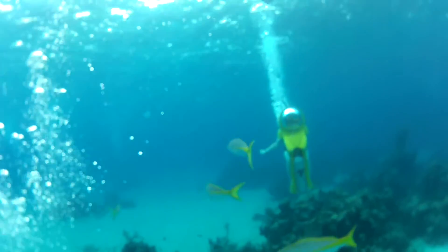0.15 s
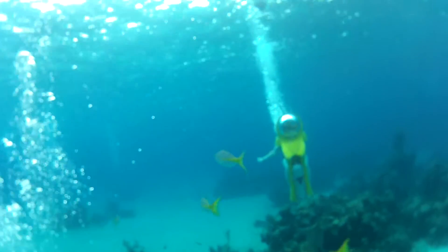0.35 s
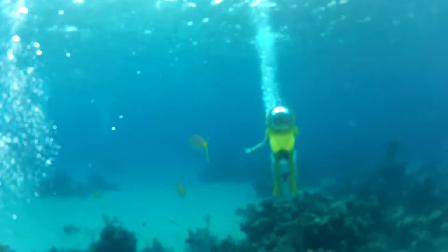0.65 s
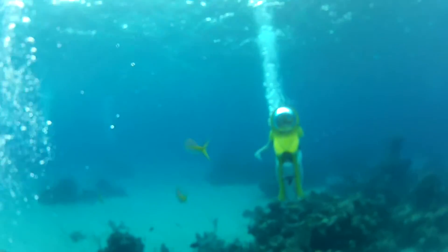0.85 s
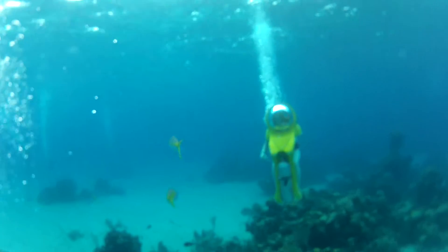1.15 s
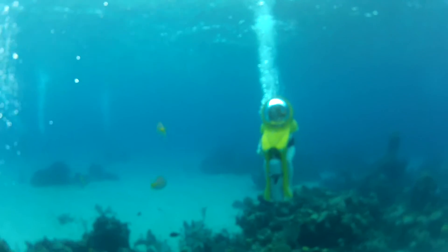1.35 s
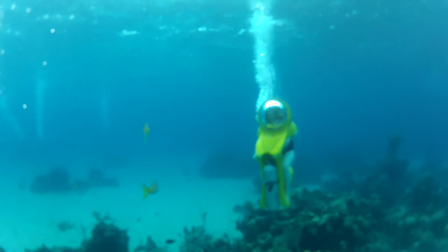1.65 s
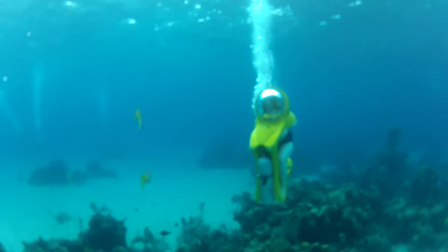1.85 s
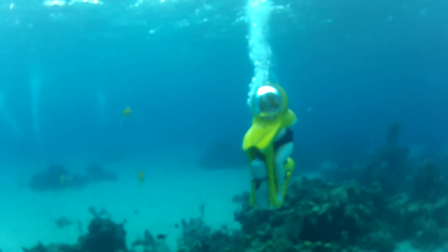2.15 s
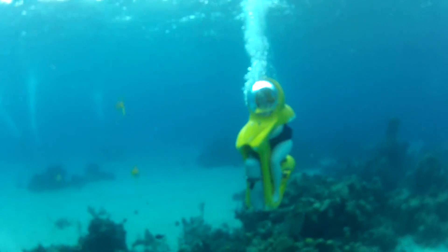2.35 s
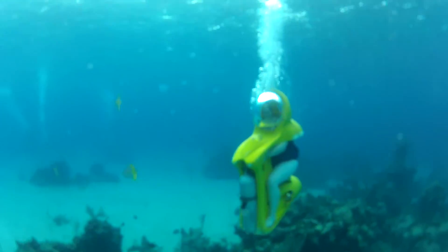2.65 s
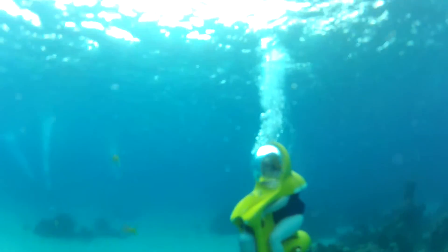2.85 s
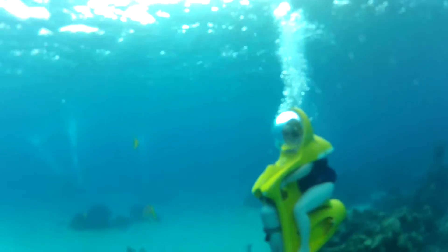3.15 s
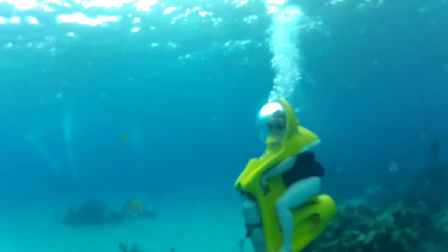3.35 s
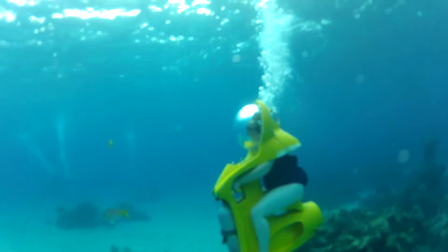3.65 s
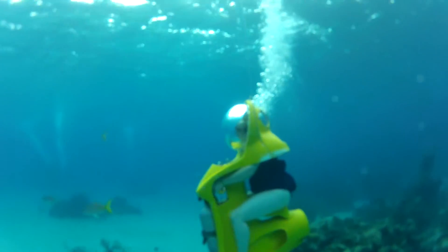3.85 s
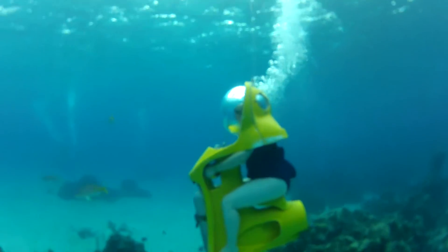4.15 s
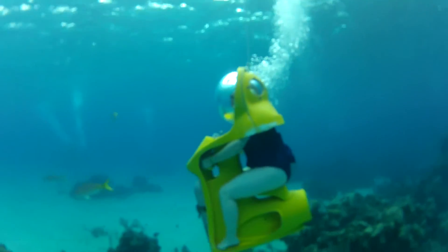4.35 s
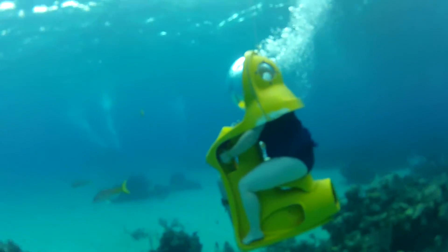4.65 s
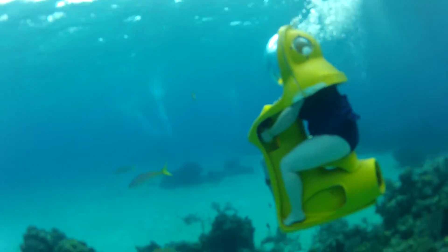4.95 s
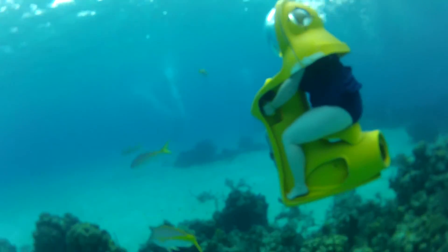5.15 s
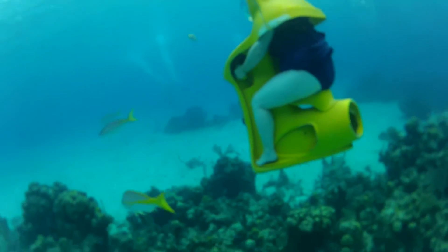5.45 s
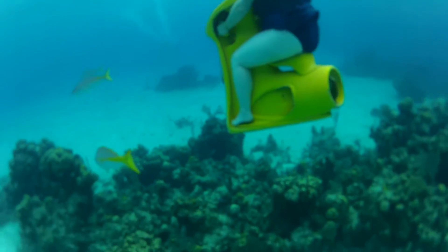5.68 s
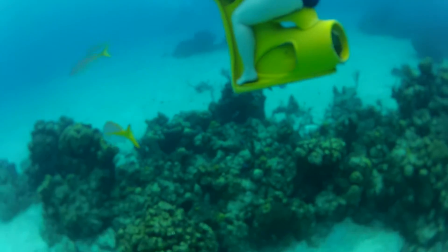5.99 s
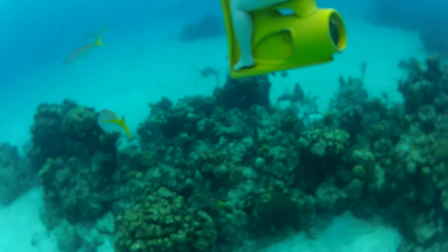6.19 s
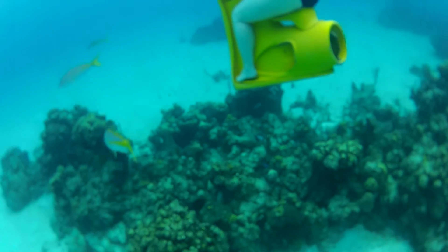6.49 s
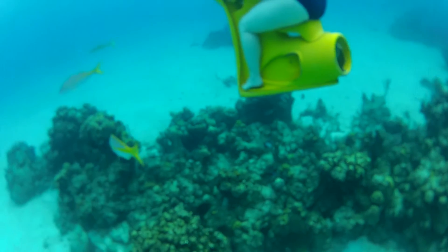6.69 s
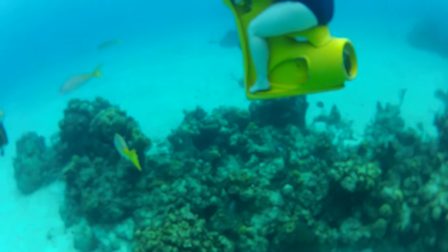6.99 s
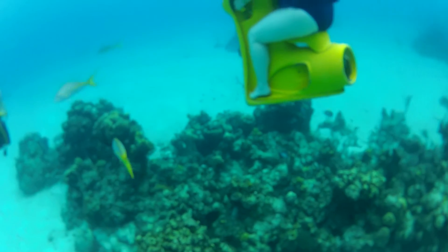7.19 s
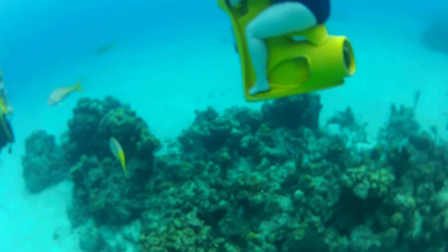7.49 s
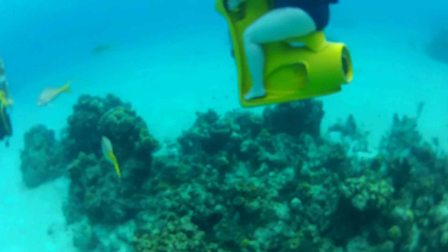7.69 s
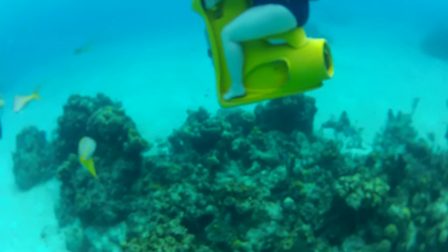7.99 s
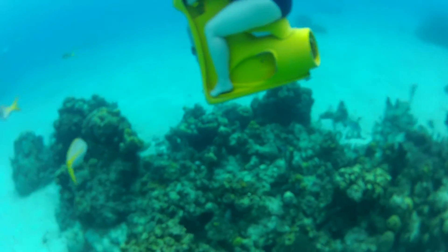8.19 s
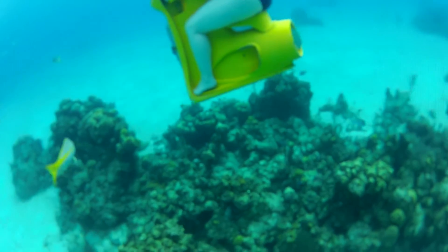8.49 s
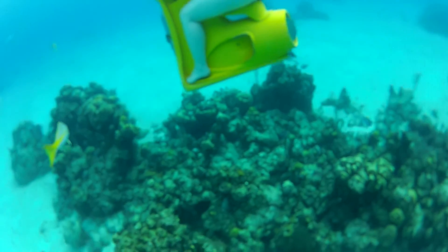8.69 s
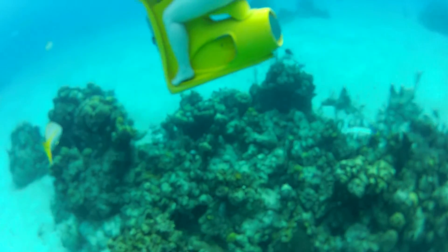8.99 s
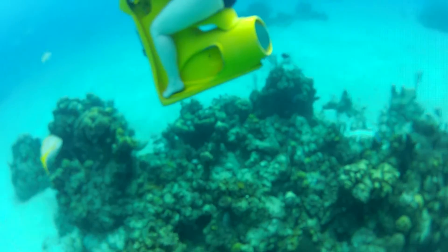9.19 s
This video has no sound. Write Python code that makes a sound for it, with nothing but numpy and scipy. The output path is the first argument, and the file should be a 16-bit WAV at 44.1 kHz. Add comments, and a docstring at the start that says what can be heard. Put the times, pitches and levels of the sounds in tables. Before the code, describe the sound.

An underwater scooter passes, heard from inside a watertight camera housing that gives higher sounds a hollow ring. From the start, its motor holds a low, steady drone while exhaust air burbles in deep swells and gulps over a soft rush of water. Faint, sharp snaps dot the first two seconds, and a sharp knock hits the housing at about 1.1 seconds. From around 2.5 seconds the propeller shaft begins a rapid, uneven, high squeaking, prominent from 4 seconds to the end. The bubbles give strong gulps near 3.6 and 4.5 seconds. Softer knocks come at about 3.8 and 5.8 seconds, followed by a tiny spurt of air. After 5 seconds the drone and burbling weaken, while the squeaks grow denser and a light propeller hiss rises, lasting until the end at about 9.3 seconds. A thin, high fizz runs faintly throughout.

```python
"""Underwater, a scooter cruises past a camera in a watertight housing.
Its motor drones, exhaust air burbles upward, and its propeller shaft rubs and squeaks twice a turn.
The squeaks, rushing water, faint snaps, a few knocks and one spurt of air ring in the housing.
A coarse sound input mirrors the scene into a thin, high fizz."""
import sys
import numpy as np
from scipy import signal
from scipy.fft import rfft, irfft, next_fast_len
from scipy.io import wavfile
from scipy.ndimage import uniform_filter1d

SR = 44100
rng = np.random.default_rng(int(sys.argv[2]) if len(sys.argv) > 2 else 0)


def put_to_file(sound):
    """Save the sound as 16-bit audio at rate SR, in the file named by the first command-line argument."""
    columns = np.atleast_2d(sound).T  # one column per channel
    safe = np.clip(columns, -1, 1)
    whole_steps = np.round(safe * 32767)
    wavfile.write(sys.argv[1], SR, whole_steps.astype(np.int16))


N = 411453
TIME = np.arange(N) / SR


def from_db(db):
    """Turn decibels into a number to multiply a sound by."""
    return 10 ** (np.asarray(db) / 20)


def rms_one(x):
    """Scale a sound so that its average power is 1."""
    return x / np.sqrt(np.mean(x ** 2) + 1e-20)


def in_time(rows):
    """Join a table's timed points with straight lines: one curve for each column after the time."""
    times, *columns = np.transpose(rows)
    return [np.interp(TIME, times, column) for column in columns]


def drift(rate_hz):
    """A smooth random wobble, about 1 in size; a higher rate makes it quicker."""
    step = 20   # samples between computed points
    decay = np.exp(-2 * np.pi * step * rate_hz / SR)
    noise = rng.standard_normal(N // step + 4002)
    slow = signal.lfilter([1], [1, -2 * decay, decay * decay], noise)[4000:]   # let it settle first
    return np.interp(np.arange(N) / step, np.arange(len(slow)), rms_one(slow))


def cut(x, hz, kind, order=2):
    """Keep the "low" or "high" side of a frequency; a higher order gives a sharper edge."""
    return signal.sosfilt(signal.butter(order, min(hz, SR / 2 - 1), kind, fs=SR, output="sos"), x)


def hiss(low_hz, high_hz, order=2):
    """Noise between two frequencies, with average power 1."""
    return rms_one(cut(cut(rng.standard_normal(N), low_hz, "high", order), high_hz, "low", order))


def add(out, start_s, sound):
    """Mix a sound in at the given time."""
    start = max(int(start_s * SR), 0)
    out[start:start + len(sound)] += sound[:max(N - start, 0)]


def motor(waver_db=1.0):
    """The spinning motor hums at whole multiples of its speed, each tone wavering a little."""
    # how fast the motor spins (time [s], speed [turns/s])
    speed = [(0, 32.84), (1.7, 32.83), (2.5, 32.69), (4.2, 32.75), (5.3, 32.88), (6.2, 32.68), (7.3, 32.85),
             (9.3, 32.68)]
    # loudness of the whole drone (time [s], relative level [dB])
    drone = [(0, -22.5), (1, -23), (1.8, -21), (3, -24), (3.9, -20.5), (4.6, -22.5), (5.4, -25.5),
             (6.3, -31), (7.3, -28), (8.3, -34), (9.33, -28)]
    # tones in the drone (multiple of the speed, relative level [dB])
    tones = [(1, -9), (2, -2), (3, -3), (4, -2.5), (5, -12.5), (6, -18), (7, -17.5), (9, -19.5)]
    angle = 2 * np.pi * np.cumsum(in_time(speed)[0]) / SR
    out = np.zeros(N)
    for multiple, db in tones:
        gain = from_db(db + waver_db * drift(0.87))
        out += gain * np.sin(round(multiple) * angle + 2 * np.pi * rng.random())
    return np.sqrt(2) * from_db(in_time(drone)[0]) * out


def bubble(hz, swell_cycles, rise, phase=0):
    """A pocket of air swells into ringing and dies away; `rise` bends its pitch upward."""
    cycles = np.arange(int(7 * swell_cycles * SR / hz)) * hz / SR
    age = cycles / swell_cycles   # 1 at the loudest moment
    swell = (age * np.exp(1 - age)) ** 2
    return swell * np.sin(2 * np.pi * cycles * (1 + rise * (age - 1)) + phase)


def bubble_stream(strengths, per_s, size_spread_db, tries=3000):
    """Bubbles break off an even flow of air at random times and in random sizes."""
    pitches, levels = np.transpose(strengths)
    out = np.zeros(N)
    for when, pitch, size, phase, chance in rng.random((tries, 5)):
        if chance < per_s * N / SR / tries:
            hz = pitches[0] * (pitches[-1] / pitches[0]) ** pitch
            gain = from_db(np.interp(hz, pitches, levels) + size_spread_db * size)
            ring = bubble(hz, swell_cycles=1.433, rise=0.0022, phase=2 * np.pi * phase)
            add(out, when * N / SR, gain * ring)
    power = uniform_filter1d(uniform_filter1d(out ** 2, size=1600), size=1600)
    return out / np.sqrt(np.abs(power) + np.mean(out ** 2) / 100)   # even out the loudness


def exhaust(large_burble_db=2.5, small_burble_db=2.16, burble_hz=9):
    """Large and small bubbles burble with the flow of air, with now and then a big gulp."""
    # air for the large bubbles, in swells that weaken as the scooter passes (time [s], level [dB])
    large_air = [(0, -22), (0.5, -15.5), (0.72, -27), (0.93, -17.5), (1.45, -19.5), (1.68, -15.5),
                 (2.05, -18.5), (2.45, -23.5), (2.85, -17.5), (3.1, -20), (3.5, -29), (3.67, -13),
                 (4.0, -29.5), (4.25, -12.5), (4.9, -24), (6.2, -26), (6.9, -27.5), (9.33, -22)]
    # air for the small bubbles (time [s], level [dB])
    small_air = [(0, -25.5), (0.55, -26), (1.4, -28), (1.7, -24.5), (3.2, -32), (3.8, -28.5), (5.3, -29.5),
                 (6.3, -31), (8.2, -30), (9.33, -30.5)]
    # how strongly large bubbles ring (pitch [Hz], relative level [dB])
    large_bubbles = [(55, -38), (78, -17), (95, 1), (115, 6), (135, -3), (165, -11.5)]
    # how strongly small bubbles ring (pitch [Hz], relative level [dB])
    small_bubbles = [(165, -7), (195, 1.5), (230, -3), (260, -0.5), (295, -13), (340, -22)]
    # single big gulps of air (time [s], peak level [dB], pitch [Hz])
    gulps = [(0.05, -10, 107.6), (0.206, -16, 237), (0.464, -11, 210), (0.599, -13, 208),
             (0.893, -5, 133.6), (1.121, -12, 132), (1.635, -21, 235), (1.806, -6.5, 92.4),
             (1.968, -6.5, 103.5), (2.152, -17, 112), (2.388, -10, 115), (2.57, -12, 122.6),
             (2.84, -13, 95.5), (3.609, -3.5, 116), (4.48, -9.5, 112.7), (4.614, -7.5, 116),
             (5.846, -9, 148), (7.265, -20, 247), (7.979, -13.5, 99), (8.135, -17.5, 211),
             (8.169, -16.5, 129), (8.323, -15.5, 187)]
    large_db = in_time(large_air)[0] + large_burble_db * drift(burble_hz)
    small_db = in_time(small_air)[0] + small_burble_db * drift(burble_hz)
    out = from_db(large_db) * bubble_stream(large_bubbles, per_s=130, size_spread_db=8.0)
    out += from_db(small_db) * bubble_stream(small_bubbles, per_s=130, size_spread_db=5.0)
    for start_s, db, hz in gulps:
        add(out, start_s, from_db(db) * bubble(hz, swell_cycles=2.05, rise=0.0047))
    return out


def shaft(attack_s=0.0007, early_s=0.0032, fade_s=0.0044, climb_s=0.002, lead_s=.002, wobble_s=.0005,
          pressed_hz=2300, wander_hz=170, sweep_spread=.45, stall_chance=.2,
          uneven_db=2.0, grit=0.43, level_db=-7):
    """Twice a turn the shaft grabs, then sticks and slips in a squeak that shoots up and fades."""
    # how fast the propeller shaft spins (time [s], speed [turns/s])
    shaft_speed = [(0.0, 18.794), (2.5, 18.738), (3.5, 18.911), (4.3, 18.832), (5.0, 18.766), (5.8, 18.741),
                   (6.5, 18.699), (7.3, 18.781), (8.1, 18.583), (8.8, 18.929), (9.33, 18.743)]
    # rubbing at two tight spots, louder as the scooter nears
    # (time [s], first spot's relative level [dB], opposite spot's relative level [dB])
    rubbing = [(0, -44, -54), (2.3, -33.5, -43), (3.1, -27, -44), (3.5, -22.5, -34), (4.1, -24, -40),
               (4.55, -18.5, -29), (4.8, -27, -32), (5.3, -23.5, -45), (5.75, -23.5, -42), (6.1, -21, -23),
               (6.9, -24, -27), (7.9, -25, -23.5), (8.6, -23.5, -25), (9.33, -23, -30)]
    # grabs where the shaft binds hard and squeaks out (time [s], relative level [dB])
    hard_rubs = [(2.476, -22.5), (3.696, -20.5), (4.119, -20.5), (4.226, -17), (4.279, -17.5),
                 (4.334, -17.5), (4.975, -19.5), (5.133, -18.5), (5.397, -23), (5.503, -16.5), (5.558, -18),
                 (5.611, -17.5), (5.77, -19.5), (5.823, -19.5), (5.876, -18.5), (6.252, -21),
                 (6.307, -19.5), (6.838, -18.5), (6.947, -17), (6.998, -18), (7.264, -19), (7.375, -17.5),
                 (7.452, -22.5), (7.556, -20), (7.747, -18.5), (8.286, -20.5), (8.709, -20.5),
                 (9.24, -17.5)]
    # the squeak at a light touch (time [s], pitch [Hz])
    light_pitch = [(0, 1700), (3.4, 1550), (5.3, 1350), (6, 1650), (7.4, 1650), (8, 2089), (9.33, 2150)]
    speed, = in_time(shaft_speed)
    half_turns = 2 * (np.cumsum(speed) / SR + speed * (lead_s + wobble_s * drift(11.7)))
    grab = np.round(half_turns).astype(int)   # which grab is nearest
    from_grab_s = (half_turns - grab) / 2 / speed
    first_db, opposite_db = in_time(rubbing)
    grab_db = np.where(grab % 2, first_db, opposite_db) + uneven_db * rng.standard_normal(400)[grab]
    for time_s, db in hard_rubs:
        grab_db[grab == grab[int(time_s * SR)]] = db
    attack = .5 + .5 * np.tanh((from_grab_s + early_s) / attack_s)
    fade = np.exp(-.5 * (np.maximum(from_grab_s, 0) / fade_s) ** 2)
    grip = .5 + .5 * np.tanh(from_grab_s / climb_s + 1)
    light_hz, = in_time(light_pitch)
    sweep_hz = (pressed_hz - light_hz) * (1 + sweep_spread * drift(15))   # no two grabs start alike
    stalled = (rng.random(400) < stall_chance)[grab]   # now and then the pitch stops halfway up
    climb = grip * np.where(stalled, .5, 1)
    squeak_hz = pressed_hz - sweep_hz * (1 - climb) + wander_hz * drift(118.86)
    squeak = np.sin(2 * np.pi * np.cumsum(squeak_hz) / SR)
    return from_db(level_db + grab_db) * attack * fade * (squeak + grit * hiss(1540, 2900, order=3))


def water(rush_boost_db=10, flutter_db=1.0):
    """Fine bubbles make a fluttering rush, and the propeller adds a brighter wash."""
    # rush of the water (time [s], relative level [dB])
    rush_levels = [(0, -45.5), (1, -46), (2, -46), (3, -46.5), (4.3, -47), (5.2, -47), (6.3, -49),
                   (7.3, -50), (8.3, -49), (9.33, -48.5)]
    # propeller wash, louder once the nozzle turns this way (time [s], level [dB])
    wash_levels = [(0, -57), (3, -53), (4.4, -44), (5, -48), (5.6, -43), (6.5, -42), (7.5, -43),
                   (8.4, -42.5), (9.33, -39.5)]
    rush = from_db(in_time(rush_levels)[0] + rush_boost_db) * hiss(250, 7820)
    wash = from_db(in_time(wash_levels)[0]) * hiss(1950, 4380, order=6)
    return (rush + wash) * from_db(flutter_db * drift(40))


def snaps(boost_db=43, far_per_s=9, far_db=-25):
    """Sharp clicks with no bass, like those of shrimp, among fainter ones from further off."""
    # the nearer snaps (time [s], relative level [dB])
    near_snaps = [(0.0552, -48), (0.157, -45), (0.2228, -46), (0.305, -49), (0.381, -48), (0.4338, -45),
                  (0.519, -48), (1.0005, -48), (1.9245, -43), (4.794, -49), (7.8485, -44)]
    far_times = rng.random(N) < far_per_s / SR
    out = from_db(far_db) * far_times * rng.standard_normal(N)
    for start_s, db in near_snaps:
        add(out, start_s, from_db([db + boost_db]))   # a click one sample long
    return cut(out, 4500, "high")


def knocks(swell_s=0.0026, low_edge_hz=780, thud_hz=225, thud_cycles=.9, thud_db=9.5,
           crack_db=14, crack_s=0.0008, crack_after_s=0.0035):
    """Each knock is a brief, dull crunch on a short thud; the harder it is, the more it cracks."""
    # knocks on the housing (time [s], strength [dB], brightness of the crunch [Hz])
    hits = [(1.092, -11.5, 1620), (1.133, -28.5, 1200), (1.223, -33, 900), (3.781, -29, 900),
            (3.805, -27.5, 900), (3.838, -29.5, 700), (5.721, -27.5, 810), (5.851, -19.5, 610)]
    age = TIME[:SR // 20]
    out = np.zeros(N)
    for start_s, db, hz in hits:
        dull_noise = cut(rng.standard_normal(len(age)), hz, "low", order=4)
        crunch = rms_one(cut(dull_noise, low_edge_hz, "high", order=4))
        crack = rms_one(cut(rng.standard_normal(len(age)), 3500, "high"))
        add(out, start_s, from_db(db) * crunch * age / swell_s * np.exp(1 - age / swell_s))
        add(out, start_s, from_db(db + thud_db) * bubble(thud_hz, thud_cycles, rise=0))
        add(out, start_s + crack_after_s, from_db(2 * db + crack_db) * crack * np.exp(-age / crack_s))
    return out


def spurt(start_s=5.879, length_s=0.049, level_db=-33):
    """A short jet of air fizzes."""
    jet_on = (TIME > start_s) & (TIME < start_s + length_s)
    jet = uniform_filter1d(jet_on.astype(float), size=600)   # soften the start and end
    return from_db(level_db) * jet * hiss(4200, 4200, order=4)


def housing(x, wall_hz=2700):
    """The housing rings at some pitches and swallows others, and its wall dulls the highs."""
    # the housing's peaks and dips (frequency [Hz], width [Hz], boost or cut [dB])
    peaks_and_dips = [(560, 940, 4), (863.3, 106, 13.5), (1083, 366, -20), (1315, 140, 8), (1575, 97, -7),
                      (1825, 83, 6), (2017, 102, -15.5), (2304, 314, 9.5), (2720, 133, 4.5),
                      (3300, 450, -3.5), (3693, 170, 10.5), (4176, 216, -9), (4340, 170, 8), (5120, 290, 1)]
    for hz, width_hz, db in peaks_and_dips:
        angle = 2 * np.pi * hz / SR
        lift = from_db(db / 2)
        spread = np.sin(angle) * width_hz / hz / 2 * np.array([1, 0, -1])
        centre = np.array([1, -2 * np.cos(angle), 1])
        x = signal.lfilter(centre + spread * lift, centre + spread / lift, x)
    return cut(x, wall_hz, "low", order=3)


def scene():
    """Deep sounds pass straight through to the microphone; higher ones ring the housing."""
    deep = motor() + exhaust()
    higher = shaft() + water() + spurt() + knocks() + snaps()
    return (deep + housing(higher))[None]   # one channel


def record(dry, input_edge_hz=5600, hold_hz=12000, cutoff_hz=15300):
    """The input holds each sample briefly, which mirrors the sound around the hold rate as a fizz."""
    narrow = cut(dry, input_edge_hz, "low", order=8)
    mirrored = narrow * (1 + 2 * np.cos(2 * np.pi * hold_hz * TIME))
    size = next_fast_len(N + SR // 10)
    frequencies = np.arange(size // 2 + 1) * SR / size
    droop = np.sinc(frequencies / hold_hz)   # holding also weakens the highs
    held = irfft(rfft(mirrored, size) * droop, size)[:, :N]
    top_cut = signal.ellip(10, .2, 80, cutoff_hz, fs=SR, output="sos")
    return signal.sosfilt(top_cut, np.clip(held, -1, 1))


dry = scene()
out = record(dry)
put_to_file(out)
```